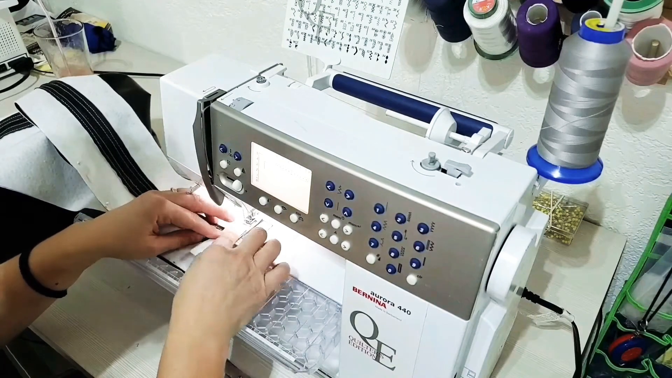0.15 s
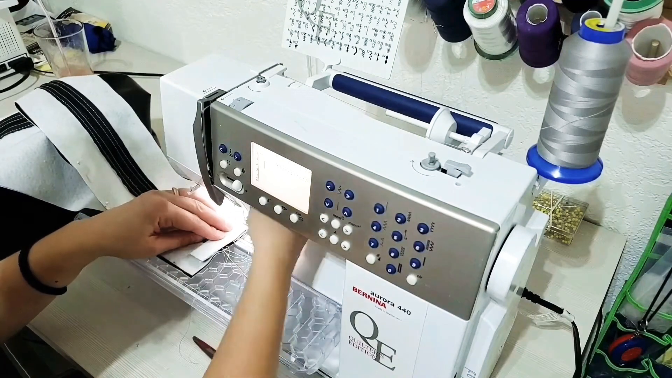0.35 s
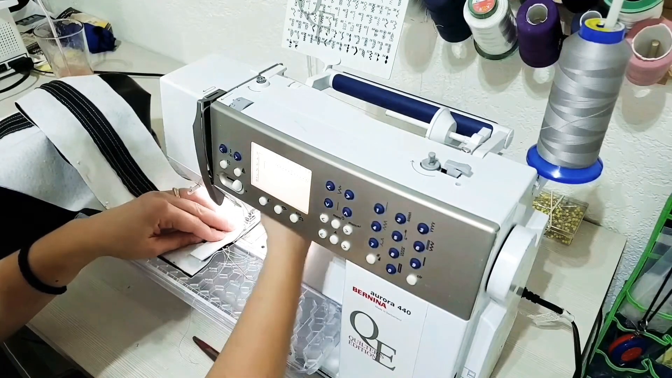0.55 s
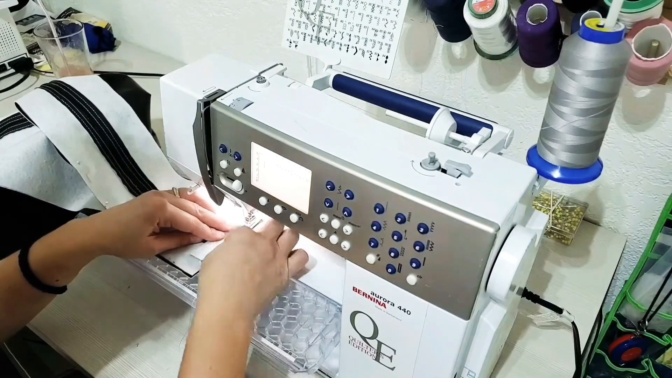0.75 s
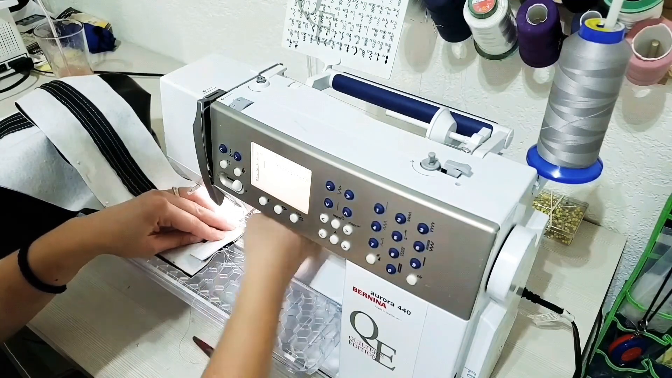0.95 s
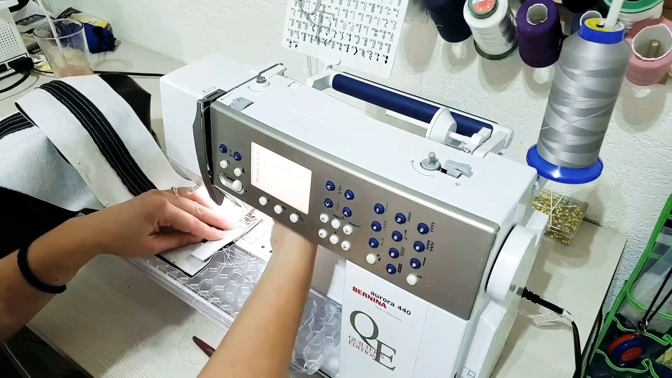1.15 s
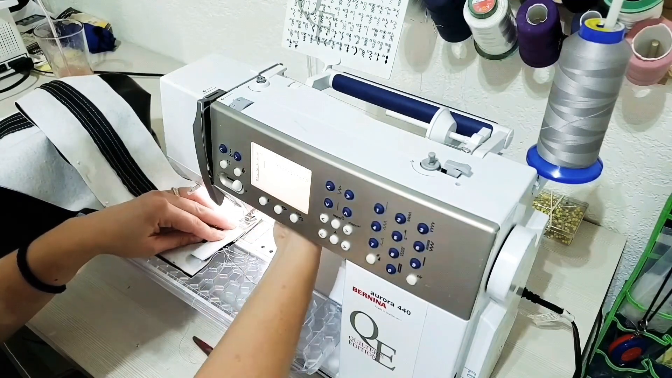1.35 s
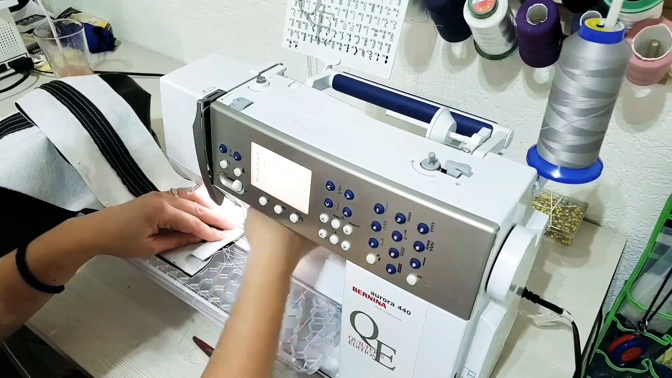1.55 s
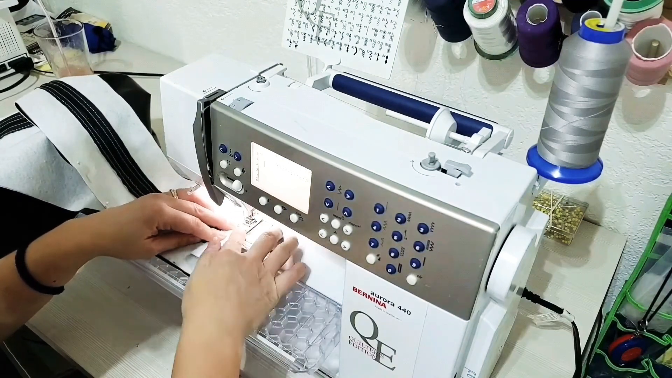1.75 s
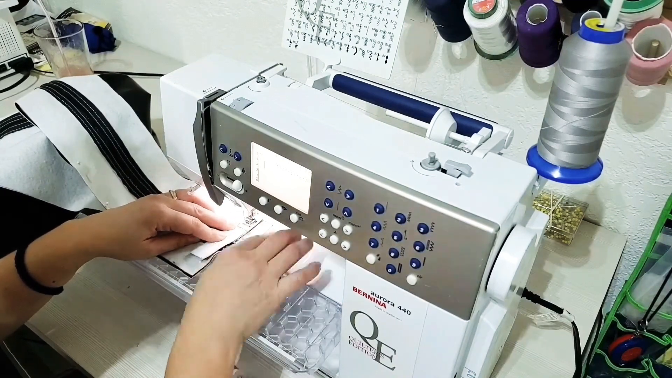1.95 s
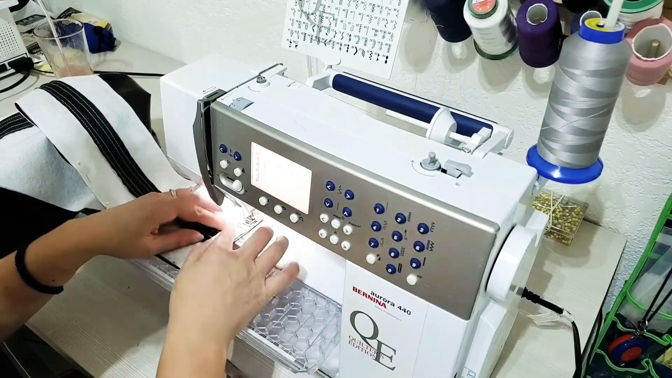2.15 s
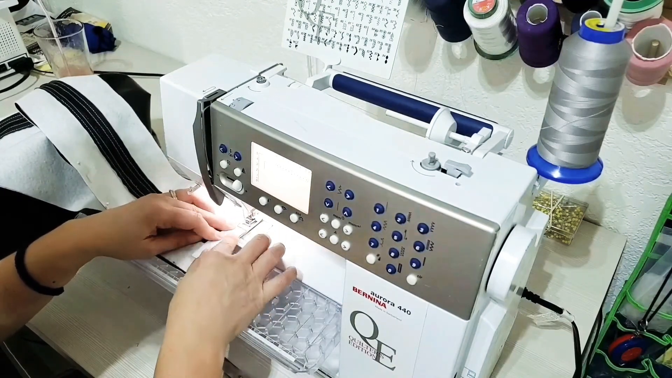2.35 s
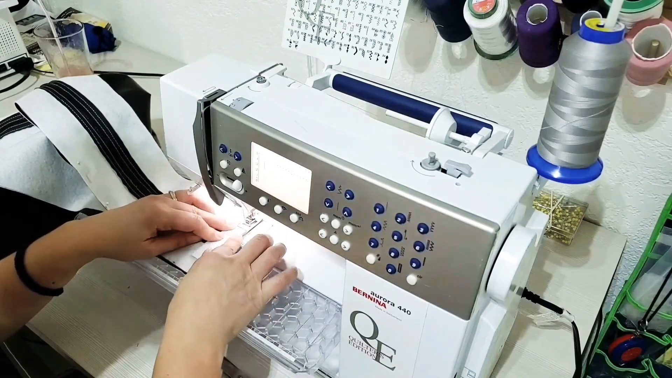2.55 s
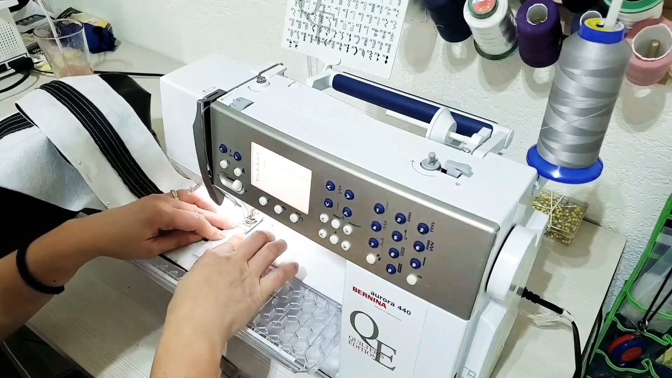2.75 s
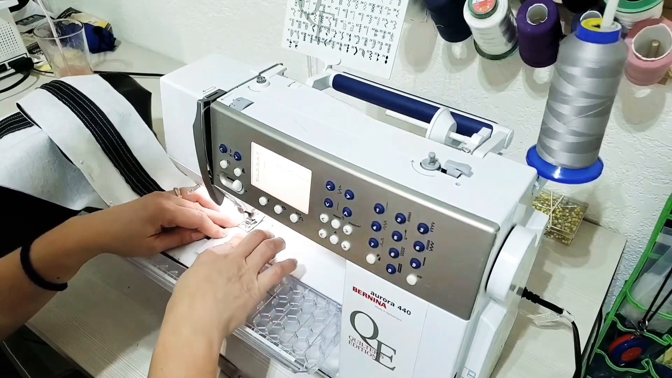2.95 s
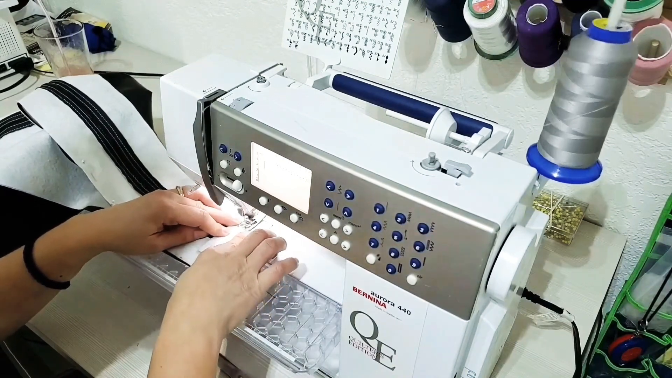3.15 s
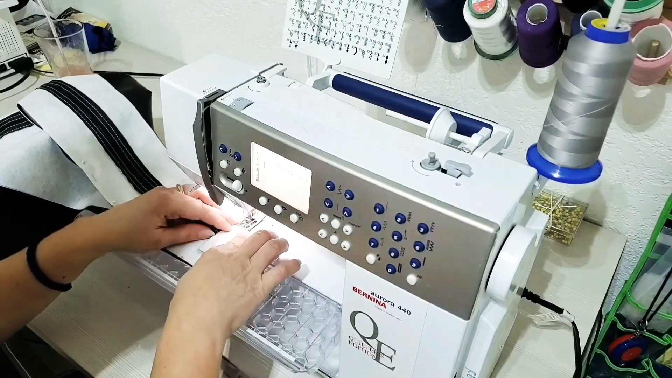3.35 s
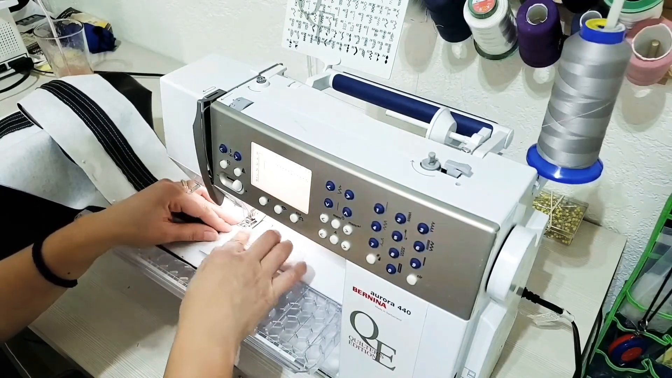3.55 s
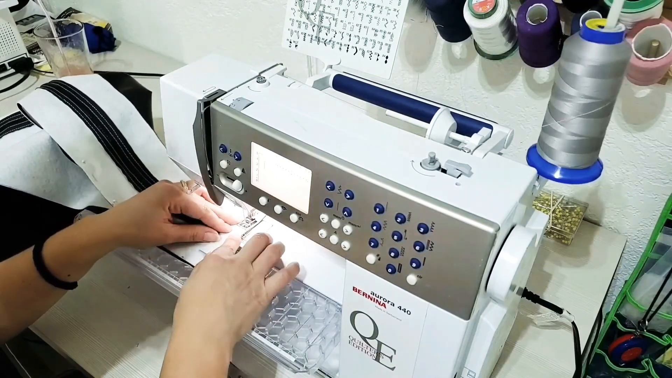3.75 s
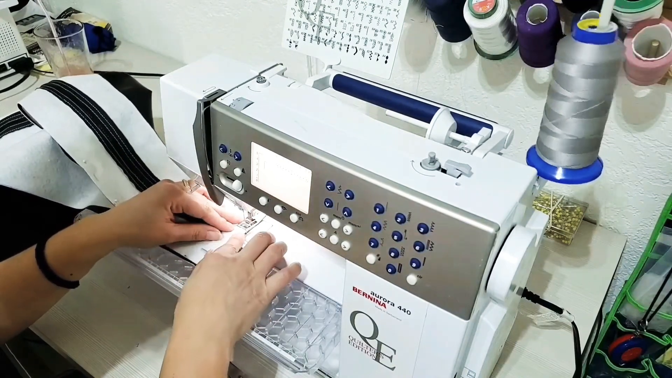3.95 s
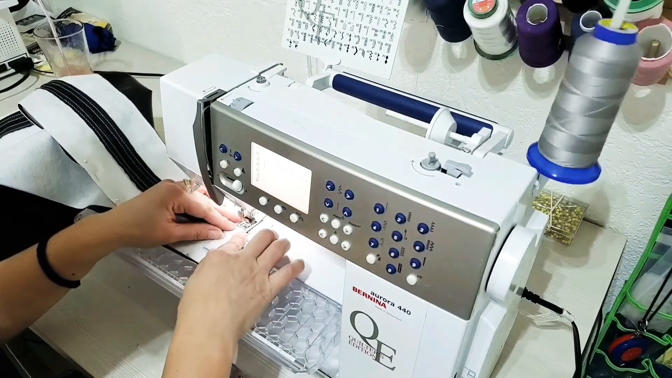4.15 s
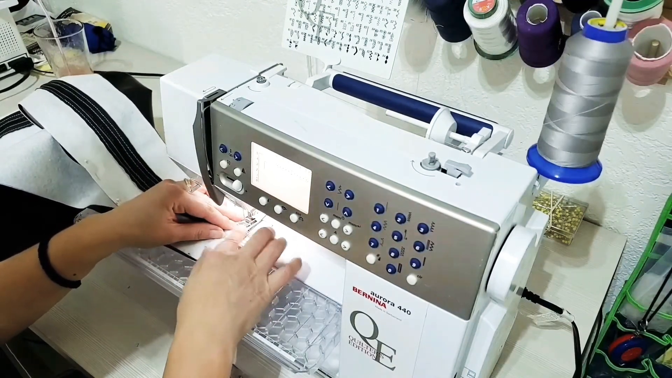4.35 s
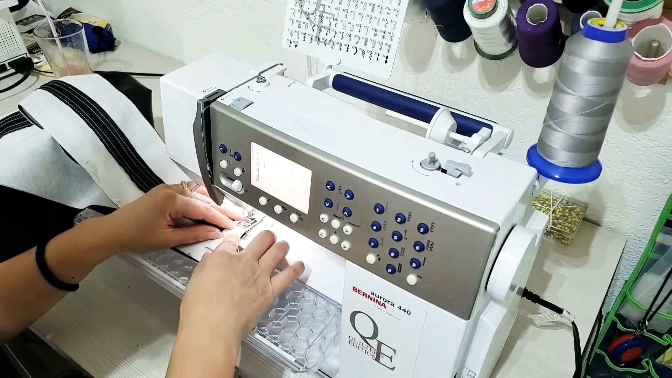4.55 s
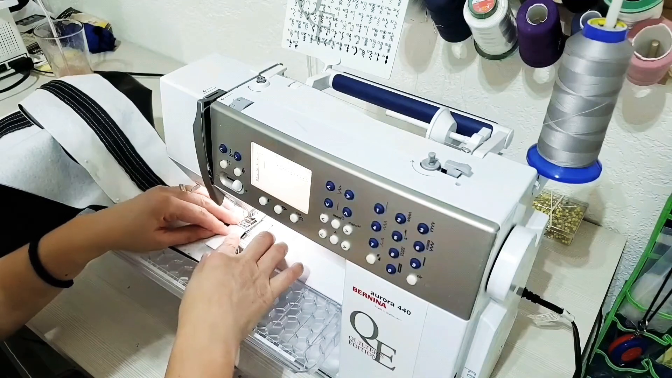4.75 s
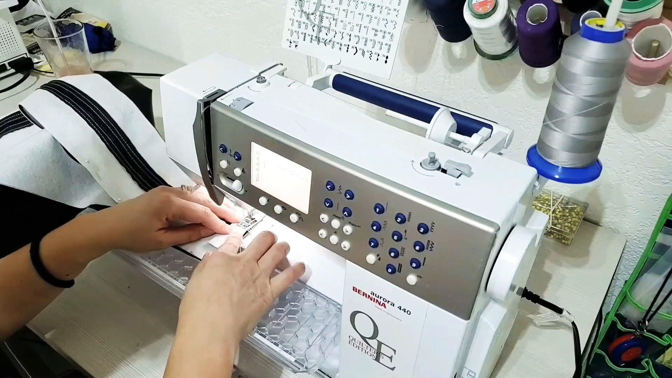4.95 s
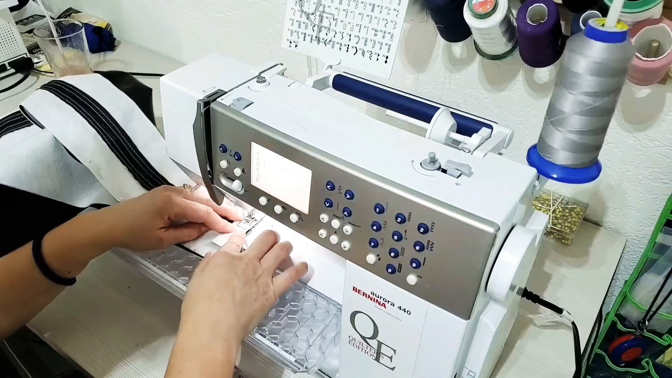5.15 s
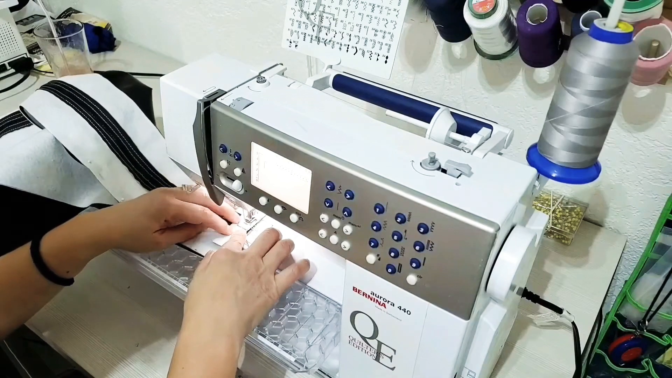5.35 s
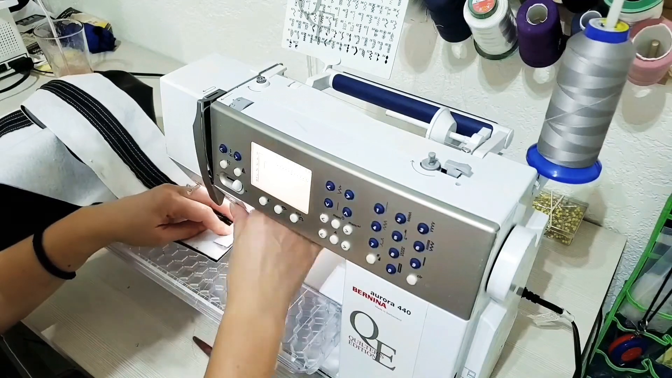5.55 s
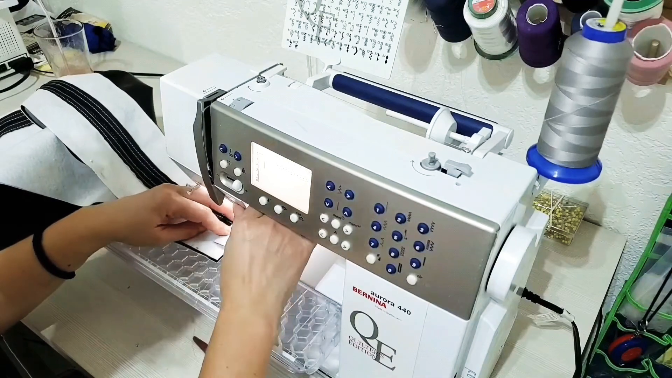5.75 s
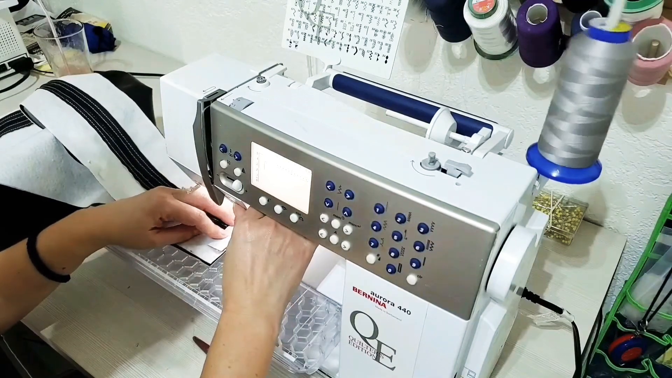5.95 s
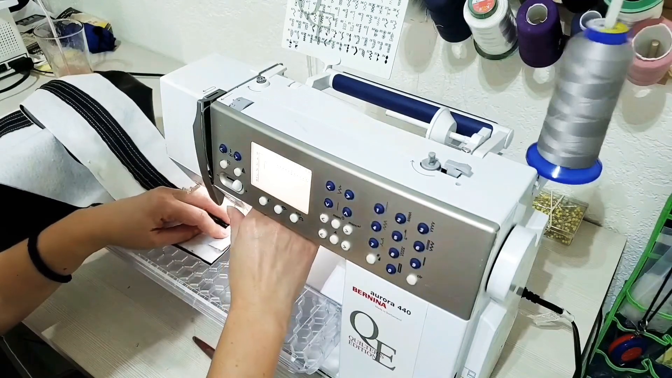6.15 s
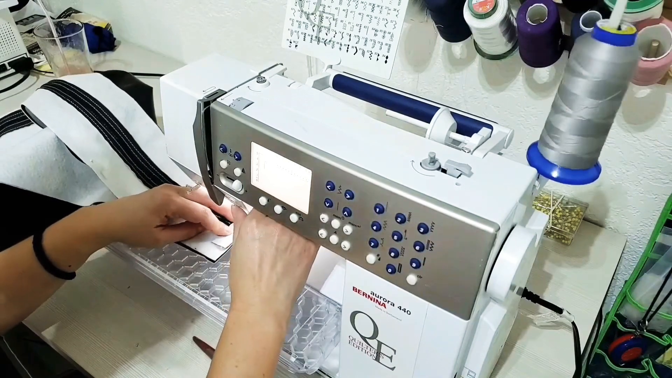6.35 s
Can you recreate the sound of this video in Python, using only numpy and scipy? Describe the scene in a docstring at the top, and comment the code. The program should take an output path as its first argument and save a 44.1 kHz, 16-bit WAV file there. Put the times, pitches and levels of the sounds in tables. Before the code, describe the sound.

After a few sharp metallic clicks and soft rubs, a sewing machine stitches thick leather in four short, grinding runs, the last still going.

```python
"""A sewing machine on a table in a small room stitches thick synthetic leather in four short, slow runs.
First the presser foot is lifted, the work is turned and the foot drops again: noise bursts and ringing modes.
Each run creeps off and takes up the load; the first three coast to rest, the last is still stitching at the end.
Gears grind as filtered random grains, the belt groans in gliding tones, steel clacks and thread ticks as noise
bursts, the needle grunts as swelling tones with a noisy scrape. Faint air and a wavering hum lie under it all."""
import sys
import numpy as np
from scipy import signal
from scipy.fft import rfft, irfft
from scipy.io import wavfile
from scipy.ndimage import uniform_filter1d

SR = 44100
rng = np.random.default_rng(int(sys.argv[2]) if len(sys.argv) > 2 else 0)


def master_out(mix):
    """Clip the mix to full scale and print it as 16-bit PCM to the path in sys.argv[1]."""
    frames = np.transpose(np.atleast_2d(mix))
    ceiling = np.clip(frames, -1, 1)
    pcm = np.round(ceiling * 32767).astype(np.int16)
    wavfile.write(sys.argv[1], SR, pcm)


N = 282007
TIME = np.arange(N) / SR

# stitching runs: start_s, take_up_s, pedal_release_s (the last lies past the end),
# load_db (scaled by how far a part follows the load)
RUNS = [(2.46, 2.539, 3.207, 0.5), (3.665, 3.719, 4.117, -5), (4.691, 4.773, 5.325, -0.5),
        (5.571, 5.625, 7, 5)]
# resonances of the machine case: pitch_hz, width_hz, rise_db over the broad spectrum
CASE = [(121, 170, 3.5), (235, 45, 3), (308.4, 42, 7.5), (438, 50, 6.5), (489, 16, 7.5), (640, 118, 7),
        (959.3, 57, 4.5), (1136, 72, 5.5), (1285, 108, 6.5), (1633, 110, 5), (1858.7, 68, 9.5),
        (2132, 49, 4), (2517, 47, 5.5), (2820, 210, 5.5), (3354, 51, 6), (4040, 120, 7), (4980, 66, 7)]
# broad bright spectrum of thread, leather glide and steel edges: pitch_hz, relative level_db
HISS = [(2500, -2), (5500, 2), (7000, 1), (9000, 2), (10800, 3), (12500, 1), (14500, -6.5)]


def amp(db):
    """Decibels to gain."""
    return 10 ** (np.asarray(db) / 20)


def unit(x):
    """Scales to an rms of one."""
    return x / np.sqrt(np.mean(x ** 2) + 1e-20)


def read(points, hz):
    """Reads a table on a log-frequency axis."""
    f, value = np.transpose(points)
    return np.interp(np.log(hz + 1), np.log(f + 1), value)


def add(mix, s, sound):
    """Mixes a sound in at s seconds."""
    part = mix[..., max(round(s * SR), 0):][..., :sound.shape[-1]]
    part += sound[..., :part.shape[-1]]


def colour(x, spectrum, modes=(), size=8192):
    """Causal filter of energy one: a broad spectrum with ringing resonances on top."""
    hz = abs(np.fft.fftfreq(size, 1 / SR))
    db = read(spectrum, hz)
    for mode_hz, width_hz, rise_db in modes:
        db = db + rise_db / (1 + (2 * (hz - mode_hz) / width_hz) ** 2)
    # minimum phase: the ringing starts at once and only dies away afterwards
    response = np.exp(signal.hilbert(np.log(amp(db))).conj())
    impulse = np.fft.ifft(response).real[:size // 2]
    impulse /= np.linalg.norm(impulse)
    return signal.oaconvolve(np.atleast_2d(x), impulse[None], axes=1)[:, :N]


def grains(per_s, spread_db, smooth, shared=0.051):
    """Small contacts of uneven size over smooth rubbing; each side favours its own end of the machine."""
    size_db = spread_db * np.minimum(rng.exponential(1, (2, N)), 3)
    sizes = amp(size_db) * rng.choice([-1, 1], (2, N))
    contacts = unit(sizes * (rng.random((2, N)) < per_s / SR))
    ends = contacts + smooth * rng.standard_normal((2, N))
    return unit(ends + shared * ends[::-1])


def chatter(rise_s, fall_s, size=4096):
    """A very fast bounce that settles: a noise burst, independent on each side, with rms one at its peak."""
    t = np.arange(size) / SR
    shape = (1 - np.exp(-t / rise_s)) * np.exp(-t / fall_s)
    return shape / shape.max() * rng.standard_normal((2, size))


def ring(db, hz, t60, rise_s=0.0037):
    """One mode set swinging: a sine with a soft onset that decays at a rate of 60 dB in t60 seconds."""
    t = np.arange(SR // 2) / SR
    envelope = (1 - np.exp(-t / rise_s)) * np.exp(-np.log(1000) * t / t60)
    return -amp(db) * envelope * np.sin(2 * np.pi * hz * t)


def feed():
    """Extra load in dB: it swells as the feed drags the leather on and sags while the feed returns."""
    # strokes of the feed: middle_s, length_s, extra load_db
    strokes = [(2.514, 0.043, 3.5), (2.683, 0.072, 5), (2.74, 0.13, -6), (2.831, 0.2, 2),
               (2.938, 0.054, -10.5), (3.005, 0.1, -3.5), (3.066, 0.049, -6), (3.21, 0.096, -2.5),
               (3.28, 0.19, 9.5), (3.943, 0.64, 10), (4.072, 0.21, -2), (4.224, 0.29, 18),
               (4.804, 0.13, 10), (4.886, 0.059, 7), (4.992, 0.081, -5.5), (5.04, 0.19, 5),
               (5.202, 0.1, -7.5), (5.354, 0.2, 5.5), (5.754, 0.21, 2), (5.891, 0.22, -4),
               (6.045, 0.35, 1.5), (6.341, 0.13, -6)]
    load_db = np.zeros(N)
    for middle, length, db in strokes:
        load_db += db * np.cos(np.pi * np.clip((TIME - middle) / length, -.5, .5)) ** 2
    return load_db


def effort(level_db, follow, creep_db, coast_db_per_s, start_s=0.039, take_up_s=0.051):
    """Gain of one machine part: offset while creeping, following the load, dying away after pedal release."""
    gain = np.zeros(N)
    for start, take_up, release, load_db in RUNS:
        loaded = np.clip((TIME - take_up) / take_up_s, 0, 1)
        coast_db = coast_db_per_s * np.maximum(TIME - release, 0)
        db = creep_db * (1 - loaded) + follow * load_db * loaded - coast_db
        gain += np.clip((TIME - start) / start_s, 0, 1) ** 2 * amp(db)
    return gain * amp(level_db + follow * feed())


def meshing(x, turn_hz=112, swing=0.203, stitch_hz=4.6, repeat=0.42):
    """Each pinion turn partly repeats the last; swinging speed slurs the resulting resonances up and down."""
    speed = turn_hz * np.exp(swing * np.sin(2 * np.pi * (stitch_hz * TIME + rng.random())))
    at = np.arange(N)
    turns = np.zeros((2, N))
    for k in range(4):
        earlier = at - k * SR / speed
        turns += repeat ** k * np.array([np.interp(earlier, at, side) for side in x])
    return turns * np.sqrt(max(1 - repeat ** 2, .1))


def gears():
    """Gear teeth knock unevenly against each other and ring the case."""
    # broad spectrum of the teeth: pitch_hz, relative level_db
    tooth_spectrum = [(25, -64), (75, 0), (125, -1.5), (185, -3), (300, -2), (550, 1), (800, 2),
                      (1300, -11.5), (1900, -19), (4000, -56)]
    teeth = meshing(grains(per_s=220, spread_db=1.0, smooth=0.19))
    gain = effort(level_db=-39, follow=0.936, creep_db=-2.5, coast_db_per_s=296.0)
    return colour(teeth * gain, tooth_spectrum, CASE)


def linkage():
    """Loose joints rattle finely in the case while the machine turns."""
    # broad spectrum of the joints: pitch_hz, relative level_db
    rattle_spectrum = [(500, -12), (1200, 2.5), (1800, -3), (3800, -1.5), (4700, -9), (6000, -10),
                       (9000, -34)]
    gain = effort(level_db=-42, follow=1.0, creep_db=-13.0, coast_db_per_s=215)
    return colour(grains(per_s=250, spread_db=2.0, smooth=0.27) * gain, rattle_spectrum, CASE)


def clacks(body_db=-5, edge_db=-5):
    """Needle bar and feed reach the end of their play: steel chatters, the case rings, a bright edge tops it."""
    # blows: start_s, level_db (before the body and edge trims), treble_db against that level
    blows = [(2.561, -33, -2), (2.64, -28.5, -22.5), (2.674, -26.5, -9), (2.739, -32, -17),
             (2.79, -27.5, -19.5), (2.839, -29, -4.5), (2.8917, -34.5, 7), (3.031, -26, -5.5),
             (3.101, -30, -1.5), (3.1891, -27, -17), (3.853, -24, -12), (3.99, -26, -8),
             (4.815, -27.5, -1.5), (4.8738, -24.5, -9), (5.011, -28, -14), (5.137, -40, 8),
             (5.243, -32, -26), (5.3198, -21, -7.5), (5.653, -27.5, -29), (5.728, -28, -18),
             (5.821, -23.5, -12), (5.946, -28, -27), (6.069, -30, -2), (6.182, -31, -1),
             (6.3127, -27.5, -4.5)]
    # broad spectrum of the blows: pitch_hz, relative level_db
    blow_spectrum = [(60, -38), (250, 0.5), (600, -15), (1400, 1), (2200, -2), (3800, 0.5), (5500, -12.5),
                     (8000, -28.5)]
    body, edge = np.zeros((2, 2, N))
    for s, db, treble_db in blows:
        add(body, s - .001, amp(db) * chatter(rise_s=0.00005, fall_s=0.011))
        add(edge, s, amp(db + treble_db) * chatter(rise_s=0.00032, fall_s=0.0098))
    return amp(body_db) * colour(body, blow_spectrum, CASE) + amp(edge_db) * colour(edge, HISS)


def belt(waver_share=0.038, throb_db=3, overtone_db=-12, trim_db=4):
    """The belt groans as the motor changes speed: short wavering, throbbing glides with weaker overtones."""
    # glides: start_s, end_s, first_hz, last_hz, level_db (before throb and trim)
    glides = [(2.522, 2.657, 382.5, 444, -45.5), (2.6, 2.733, 518, 480, -43),
              (2.78, 2.935, 482, 492.7, -43.5), (2.904, 3.036, 440, 401.8, -50),
              (3.1, 3.319, 342.8, 287.7, -51), (3.134, 3.26, 625, 686, -54), (3.79, 3.893, 481, 491, -39.5),
              (3.896, 4.052, 353, 247.2, -56), (3.947, 4.084, 441.5, 384, -45.5),
              (4.753, 4.849, 713.6, 635, -44), (4.934, 5.055, 411, 406.5, -43.5),
              (5.059, 5.171, 217.7, 226, -49), (5.161, 5.288, 290.5, 320, -45.5),
              (5.27, 5.364, 674, 664, -43.5), (5.358, 5.437, 736, 523, -57.5),
              (5.721, 5.839, 272.6, 343.5, -44), (5.762, 5.96, 441.7, 311.5, -49),
              (5.85, 6.052, 134.5, 179.7, -45.5), (6.004, 6.171, 200.8, 326.5, -43),
              (6.115, 6.209, 201.7, 246, -39.5), (6.186, 6.298, 254, 313, -43.5)]
    out = np.zeros(N)
    for start, end, first_hz, last_hz, level_db in glides:
        t = np.arange(start, end, 1 / SR)
        hz = np.linspace(first_hz, last_hz, len(t))
        slow_noise = unit(uniform_filter1d(rng.standard_normal((2, SR)), size=400))
        waver, throb = slow_noise[:, :len(t)]
        phase = 2 * np.pi * np.cumsum(hz * (1 + waver_share * waver)) / SR
        tone = sum(amp(overtone_db * k) * np.sin((k + 1) * phase) for k in range(3))
        swell = amp(level_db + throb_db * throb) * signal.windows.tukey(len(t), .8)
        add(out, start, unit(tone) * swell)
    return amp(trim_db) * out


def punches():
    """Thick leather grips the needle: a swelling two-partial judder, and a rough scrape that rings the case."""
    # punches: start_s, level_db, pitch_hz, length_s, scrape_db (against the judder), upper_hz,
    # upper_db (against the judder), left_lead_radians
    grips = [(3.107, -20.5, 550, 0.021, -15.5, 910, -11.5, -2),
             (4.122, -20, 537.4, 0.023, -4.5, 860, -10, 0.67),
             (5.069, -21.5, 542, 0.03, -10.5, 906.5, -8, 3), (6.003, -19, 643, 0.038, -4.5, 1097, -8, -.5),
             (6.128, -22.5, 671, 0.028, -8.5, 1212, -8, 1), (6.342, -26, 562, 0.035, -7.5, 906, -0.5, -2)]
    # broad spectrum of the scrape: pitch_hz, relative level_db
    scrape_spectrum = [(100, -2), (350, 1), (600, 4), (1000, 3), (1400, 0), (2200, -11.5), (4000, -15),
                       (8000, -42)]
    judder, scrape = np.zeros((2, 2, N))
    for s, db, hz, length, scrape_db, upper_hz, upper_db, lead in grips:
        t = np.arange(0, length, 1 / SR)
        swell = amp(db) * np.sin(np.pi * t / length) ** 2
        sides = np.array([[lead], [0]])
        lower = np.sin(2 * np.pi * hz * t + sides)
        upper = amp(upper_db) * np.sin(2 * np.pi * upper_hz * t + sides)
        add(judder, s, swell * (lower + upper))
        add(scrape, s + length / 4, amp(db + scrape_db) * chatter(rise_s=0.0091, fall_s=0.01))
    return judder + colour(scrape, scrape_spectrum, CASE)


def thread():
    """Thread runs through the guides and the feed drags the leather along: dense, bright grains."""
    gain = effort(level_db=-50.5, follow=1.21, creep_db=-15.5, coast_db_per_s=197)
    return colour(grains(per_s=980, spread_db=7.0, smooth=0.48) * gain, HISS)


def ticks(trim_db=1):
    """The thread snaps taut or slips off the hook: short bright noise bursts with a stereo balance."""
    # snaps: start_s, level_db (before balance and trim), left_minus_right_db
    snaps = [(2.563, -41, 3), (2.898, -27, 1), (2.9625, -34.5, -2.5), (3.032, -34, 0.5), (3.901, -32, -2),
             (3.948, -29, 0), (4.7885, -26.5, -1), (5.666, -22.5, -2), (5.8683, -26.5, -1.5),
             (6.224, -28.5, -4)]
    sides = np.zeros((2, N))
    for s, db, pan_db in snaps:
        balance_db = np.array([[pan_db], [-pan_db]]) / 2
        add(sides, s - .001, amp(db + balance_db) * chatter(rise_s=0.0004, fall_s=0.0019))
    return amp(trim_db) * colour(sides, HISS)


def thumps(trim_db=11):
    """Jolts, needle shudders and the motor's kick set low modes of case and table swinging."""
    # hands, the foot lever and hard stitches jolt the machine, and a soft low bump comes at 1.97 s (level
    # before the trim): start_s, level_db, tilt_db_per_octave towards the higher modes
    jolts = [(0.303, -36, 2), (0.319, -52, 13.5), (0.394, -28.5, -7), (1.341, -68, 16),
             (1.356, -33.5, -8.5), (1.458, -47.5, 0.5), (1.966, -50, -9.5), (4.779, -38, -3),
             (5.734, -49.5, -10)]
    # modes of the machine on its table: pitch_hz, relative level_db, t60_s
    table_modes = [(88.4, 0, 0.09), (150, -12, 0.059), (251, -25, 0.18), (305.6, 0.5, 0.061)]
    # the bed shudders as the needle goes in: start_s, level_db (before the trim)
    shudders = [(2.607, -38), (2.772, -36), (3.13, -42.5), (3.923, -40), (4.894, -40.5), (4.995, -44),
                (6.262, -44)]
    out = np.zeros(N)
    for s, db, tilt_db in jolts:
        for hz, mode_db, t60 in table_modes:
            octaves = np.log2(hz / table_modes[0][0])
            add(out, s, ring(db + mode_db + tilt_db * octaves, hz, t60))
    for s, db in shudders:
        add(out, s, ring(db, hz=121.4, t60=0.15))
    # the motor kicks in with a short growl at every start
    for start, *_ in RUNS:
        note = ring(-50, hz=544, t60=0.23, rise_s=0.025)
        growl = unit(uniform_filter1d(rng.standard_normal(len(note)), size=500))
        add(out, start, note * growl)
    return amp(trim_db) * out


def foot(body_db=-3, edge_db=-5):
    """The presser foot is lifted, then dropped: its sprung bar slides, chatters on the case and rings briefly."""
    # contacts: start_s, level_db (before the body and edge trims), treble_db (against that level),
    # swell_s, steel_ring_db (against that level)
    contacts = [(0.28, -38, -22, 0.014, -29), (0.309, -35, -20, 0.0018, -2), (0.3177, -34.5, 0, 0.00031, 0),
                (0.381, -28.5, -14, 0.0019, -14), (0.396, -36.5, -9.5, 0.00185, -8),
                (1.335, -36.5, -6, 0.0075, -9), (1.344, -38, -0.5, 0.0012, 1),
                (1.359, -38.5, -12.5, 0.00157, 5.5)]
    # steel resonances of foot and bar: pitch_hz, width_hz, rise_db over the broad spectrum
    steel_modes = [(3327, 460, 8.5), (5000, 510, 3)]
    # broad spectra of the foot body and its steel: pitch_hz, relative level_db
    body_spectrum = [(60, -13), (230, 6), (560, 4), (900, 6.5), (1400, -2.5), (2000, -0.5), (2600, -9),
                     (4000, -6), (6000, -25.5), (9000, -30.5)]
    steel_spectrum = [(900, -0.5), (2000, -3), (3400, -4), (6500, -7), (8500, -25)]
    body, edge, steel = np.zeros((3, 2, N))
    for s, db, treble_db, rise_s, ring_db in contacts:
        add(body, s, amp(db) * chatter(rise_s, fall_s=0.012))
        add(edge, s, amp(db + treble_db) * chatter(rise_s, fall_s=0.022))
        add(steel, s, amp(db + ring_db) * chatter(rise_s, fall_s=0.0085))
    bodies = amp(body_db) * colour(body, body_spectrum, CASE)
    edges = amp(edge_db) * colour(edge, HISS)
    return bodies + edges + colour(steel, steel_spectrum, steel_modes)


def knocks(trim_db=3.5):
    """Lever, spring and bar strike home, each with its own decaying note."""
    # strikes: start_s, level_db (before the trim), pitch_hz, t60_s
    strikes = [(0.283, -38, 2098, 0.02), (0.286, -33.5, 480, 0.05), (0.311, -32, 403.6, 0.06),
               (0.313, -47, 3360, 0.23), (0.381, -27, 1360, 0.026), (0.414, -34, 150.2, 0.11),
               (0.394, -44, 1874, 0.05), (0.44, -44, 265.4, 0.29), (1.355, -39, 3510, 0.071)]
    out = np.zeros(N)
    for s, db, hz, t60 in strikes:
        add(out, s, ring(db, hz, t60, rise_s=0.0016))
    return amp(trim_db) * out


def scuffs(rub_trim_db=0.5):
    """Hands shift the leather on the bed: soft rubs with a light rustle on a fade of its own."""
    # rubs: start_s, level_db (before the trim), swell_s, fade_s, rustle_db against that level
    shifts = [(0.515, -55, 0.0031, 0.036, -7.5), (0.771, -46, 0.031, 0.011, -9.5),
              (1.161, -45, 0.0012, 0.0121, -22), (1.443, -49, 0.0045, 0.033, -8)]
    # broad spectra of rub and rustle: pitch_hz, relative level_db
    rub_spectrum = [(100, 15), (400, 10.5), (750, 16.5), (1200, 5.5), (2000, 1.5), (4500, -41), (8000, -32)]
    rustle_spectrum = [(600, -30), (1900, 7), (4800, -1), (8000, -18)]
    rubs, rustle = np.zeros((2, 2, N))
    for s, db, rise_s, fall_s, rustle_db in shifts:
        add(rubs, s, amp(db) * chatter(rise_s, fall_s))
        add(rustle, s, amp(db + rustle_db) * chatter(rise_s, fall_s=0.026))
    return amp(rub_trim_db) * colour(rubs, rub_spectrum) + colour(rustle, rustle_spectrum)


def slides():
    """Leather glides over the bed under the hands: a faint, smooth hiss."""
    # glides of the leather: start_s, length_s, level_db
    leather_glides = [(0.48, 0.13, -69.5), (1.467, 0.15, -70.5), (4.203, 0.28, -70)]
    rubs = np.zeros(N)
    for s, length, db in leather_glides:
        arch = signal.windows.tukey(round(length * SR), .5)
        add(rubs, s, amp(db) * arch * rng.standard_normal(len(arch)))
    return colour(rubs, HISS)


def hum(waver_hz=11.3):
    """Low hum of the room: narrow noise bands that waver, swell and fade, each on its own."""
    # hum lines: pitch_hz, level_db of one layer
    lines = [(60, -64), (117, -66.5), (268, -72.5), (362, -76.5)]
    hz = np.fft.rfftfreq(N, 1 / SR)
    out = np.zeros((2, N))
    for line_hz, db in lines:
        band = np.exp(-((hz - line_hz) / waver_hz) ** 2)
        out += amp(db) * unit(irfft(band * rfft(rng.standard_normal((2, N))), N))
    return out


def air(level_db=-60, shared=0.023, swell_db=1.5):
    """Low rumble and hum of the room swell and sink under a faint steady hiss."""
    # broad spectrum of the room air: pitch_hz, relative level_db
    air_spectrum = [(20, -15.5), (80, -2), (190, -17.5), (370, -13), (1000, -24.5), (1300, -19),
                    (1600, -34), (4500, -38), (7300, -48), (9300, -34), (14500, -40.5)]
    noise = rng.standard_normal((2, N))
    bed = amp(level_db) * unit(colour(noise + shared * noise[::-1], air_spectrum)) + hum()
    rumble = signal.sosfilt(signal.butter(1, 300, fs=SR, output="sos"), bed)
    rates_hz = np.geomspace(1.2, 8, num=8)
    swell = unit(sum(np.sin(2 * np.pi * (rate * TIME + rng.random())) for rate in rates_hz))
    return bed + rumble * (amp(swell_db * swell) - 1)


def shifting(x, patch_db=2.5, patch_hz=420, patch_s=.035):
    """The clatter's colour keeps changing in random patches of pitch and time as different parts take the load."""
    z = signal.stft(x, SR, nperseg=512)[2]
    bins = max(round(patch_hz * 512 / SR), 1)
    frames = max(round(patch_s * SR / 256), 1)
    patches = uniform_filter1d(rng.standard_normal(z.shape[1:]), bins, axis=0)
    patches = uniform_filter1d(patches, frames, axis=1)
    gain = unit(amp(patch_db * unit(patches)))
    return signal.istft(z * gain, SR, nperseg=512)[1][:, :N]


def room(x, near_db, wet_db, near_s=0.0063, lag_s=.0009, size=16384):
    """Two spaced listening points get direct sound, scatter from table and wall, and a short tail."""
    # decay of the room: pitch_hz, t60_s
    decay = [(100, 0.4), (500, 0.25), (1400, 0.3), (4000, 0.24), (12000, 0.11)]
    t = np.arange(size) / SR
    taps = rng.choice([-1., 1.], (2, 2, size)) * (rng.random((2, 2, size)) < 5000 / SR)
    near = taps[0] * np.exp(-t / near_s) * (t > lag_s)
    hz, frame_s, z = signal.stft(taps[1] * (1 - np.exp(-t / 0.0033)), SR, nperseg=256)
    fade = amp(-60 * frame_s / read(decay, hz)[:, None])
    tail = signal.istft(z * fade, SR, nperseg=256)[1][:, :size]
    paths = (amp(near_db) * unit(near) + amp(wet_db) * unit(tail)) / np.sqrt(size)
    # direct sound: the right side hears it lag_s later
    paths[0, 0] += 1
    paths[1, round(lag_s * SR)] += 1
    # the many paths ripple the spectrum finely and leave its broad balance alone
    response = np.fft.fft(paths, 2 * size)
    broad = np.sqrt(uniform_filter1d(abs(response) ** 2, size=80, axis=1, mode="wrap"))
    response /= np.exp(signal.hilbert(np.log(broad)).conj())
    impulse = np.fft.ifft(response).real[:, :size]
    return signal.oaconvolve(np.atleast_2d(x), impulse, axes=1)[:, :N]


def scene():
    """The machine and its table in the room, each group of parts with its own paths to the listener."""
    # small left/right balances in dB on the gears and the needle
    drive = room(gears(), near_db=5.5, wet_db=-10.5) * amp([[.3], [-.3]])
    rattle = room(linkage() + thread(), near_db=10.5, wet_db=-10)
    blows = room(clacks(), near_db=4, wet_db=-10)
    groans = room(belt(), near_db=-4, wet_db=-11.5, lag_s=0.00059)
    needle = room(punches(), near_db=-12, wet_db=-12, lag_s=0) * amp([[1], [-1]])
    snaps = room(ticks(), near_db=2.0, wet_db=-3)
    jolts = room(thumps(), near_db=-11.5, wet_db=-16, lag_s=.002)
    handling = room(foot() + scuffs() + slides(), near_db=5.5, wet_db=-2)
    lever = room(knocks(), near_db=-4.5, wet_db=-19.5, lag_s=0.00056)
    machine = shifting(drive + rattle + blows) + groans + needle + snaps + jolts
    # a second, independent hum layer joins the one inside the air
    return machine + handling + lever + air() + hum()


def record(dry, edge_hz=14720):
    """A steep low-pass takes away the treble above edge_hz."""
    low_pass = signal.firwin(301, edge_hz, window=("kaiser", 8), fs=SR)
    return signal.oaconvolve(dry, low_pass[None], "same")


dry = scene()
out = record(dry)
master_out(out)
```